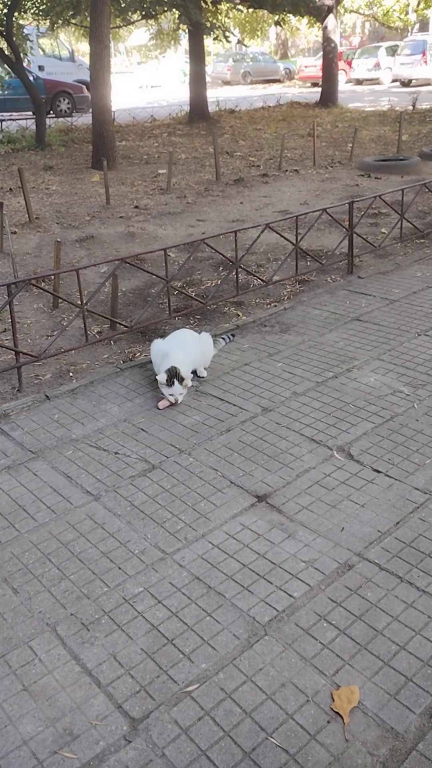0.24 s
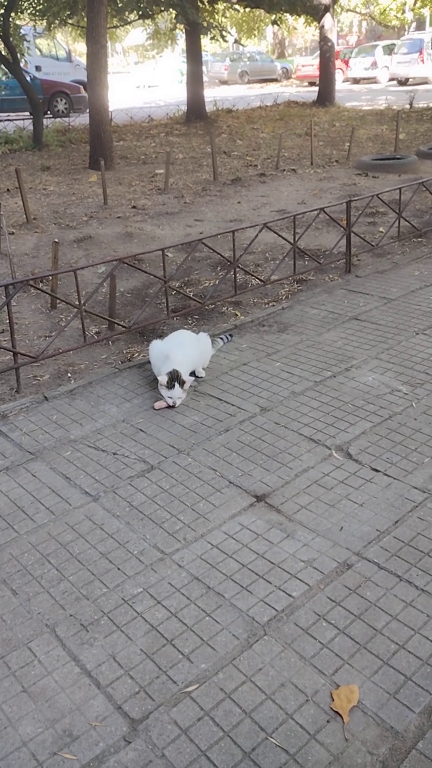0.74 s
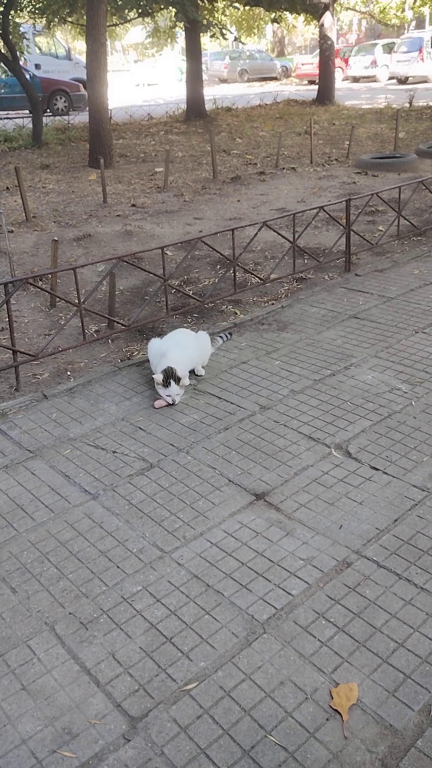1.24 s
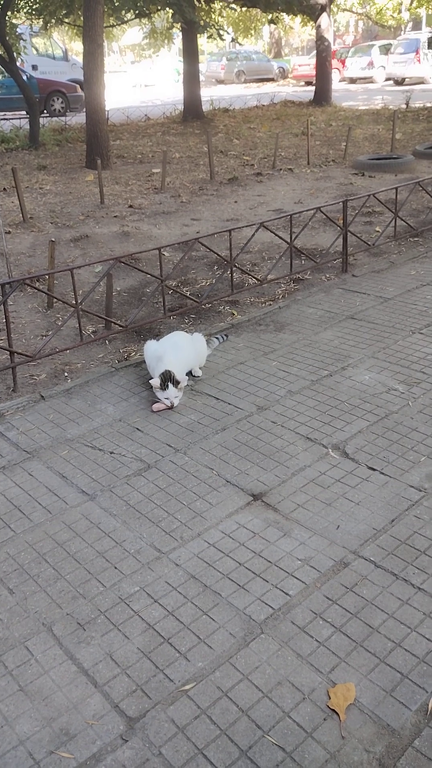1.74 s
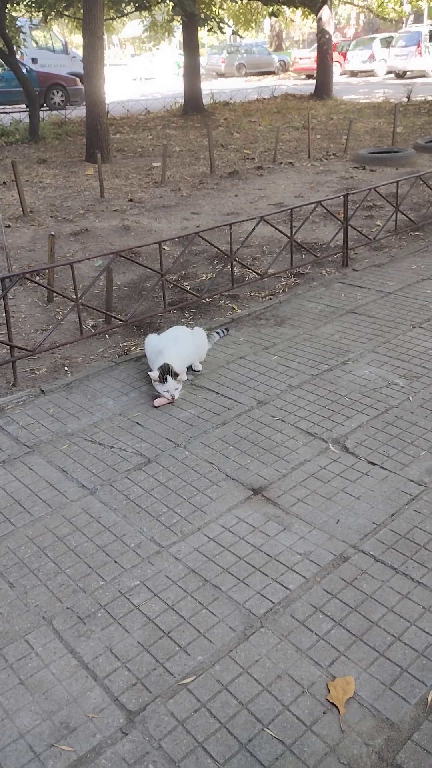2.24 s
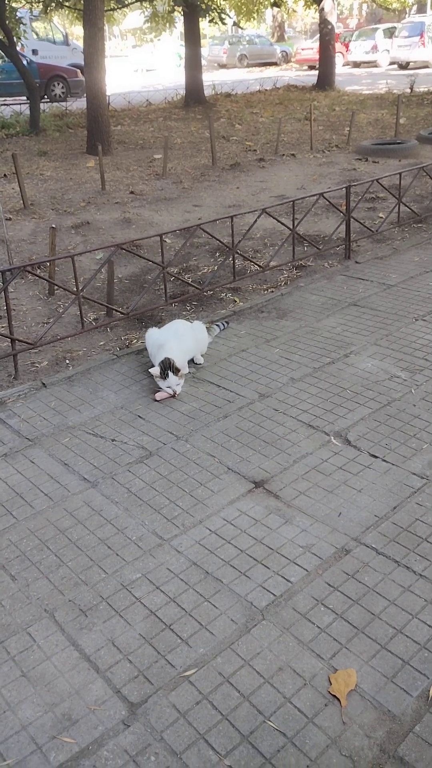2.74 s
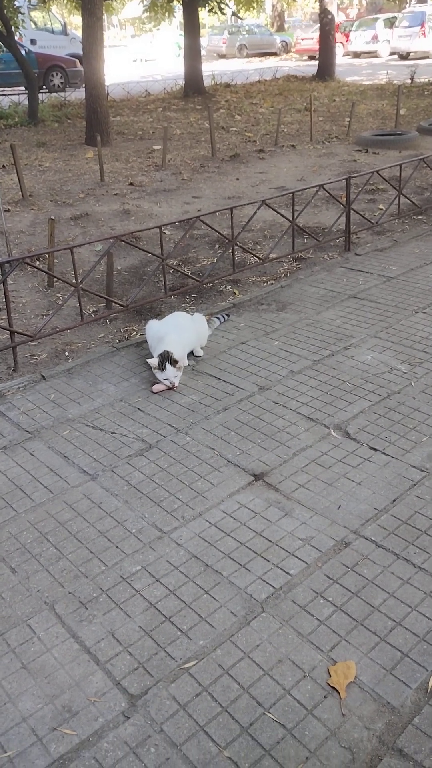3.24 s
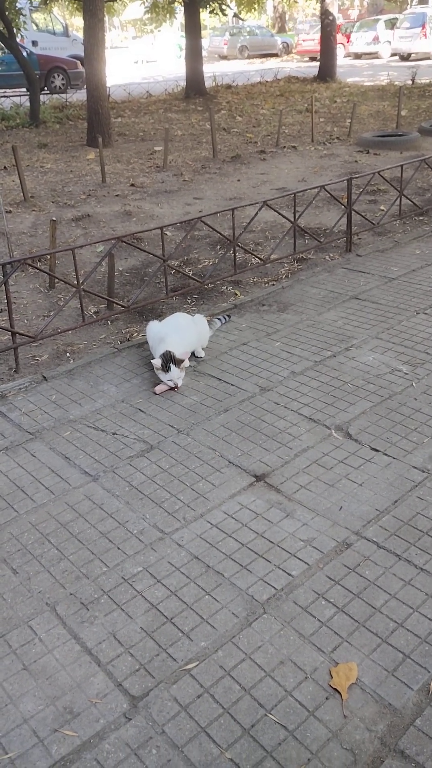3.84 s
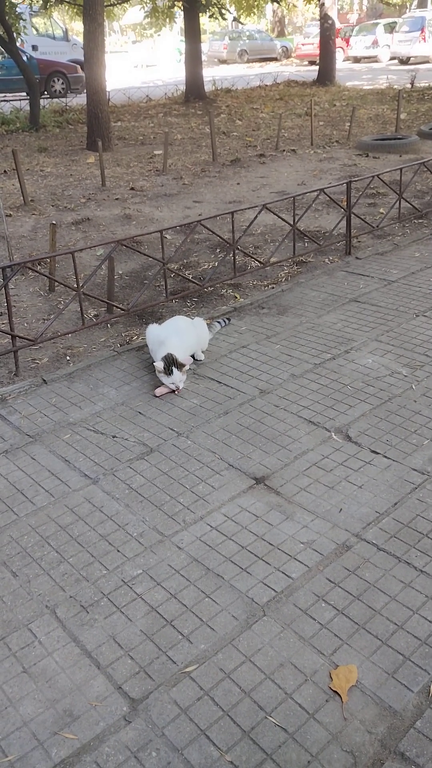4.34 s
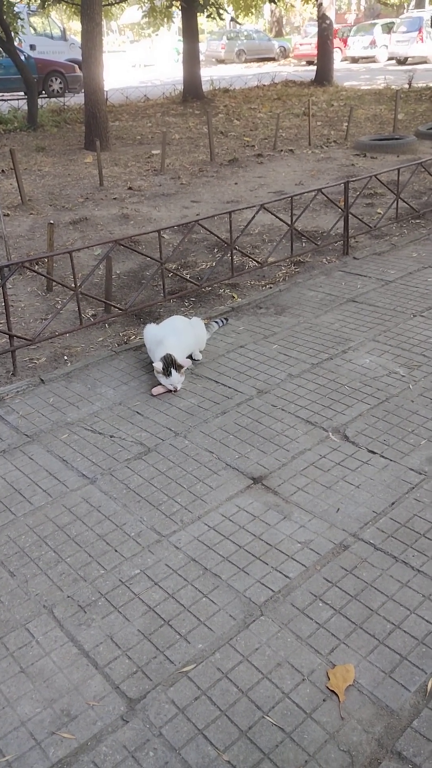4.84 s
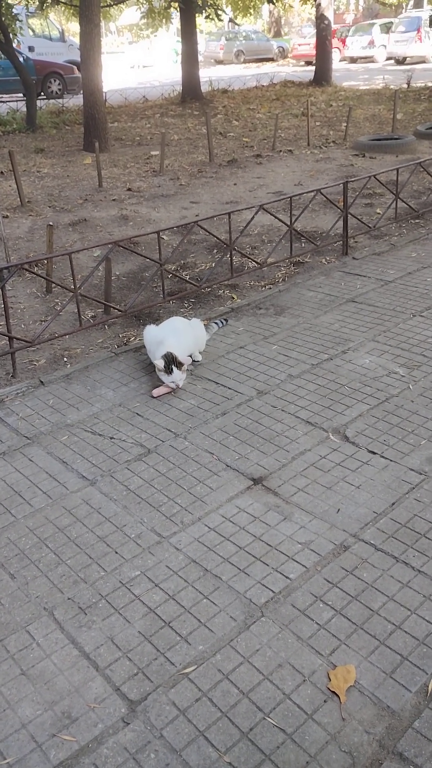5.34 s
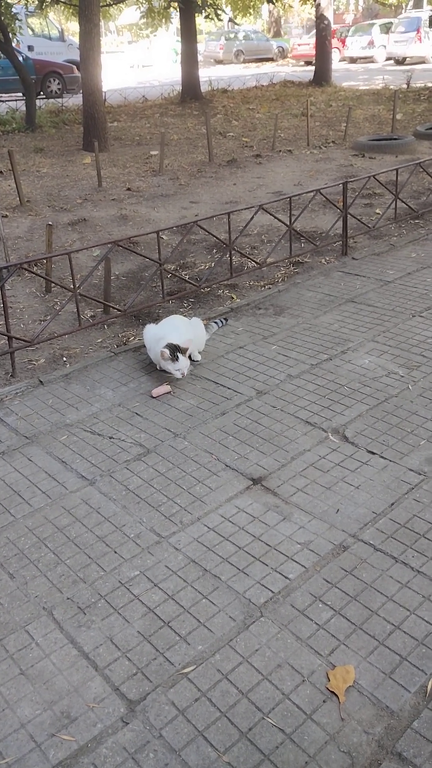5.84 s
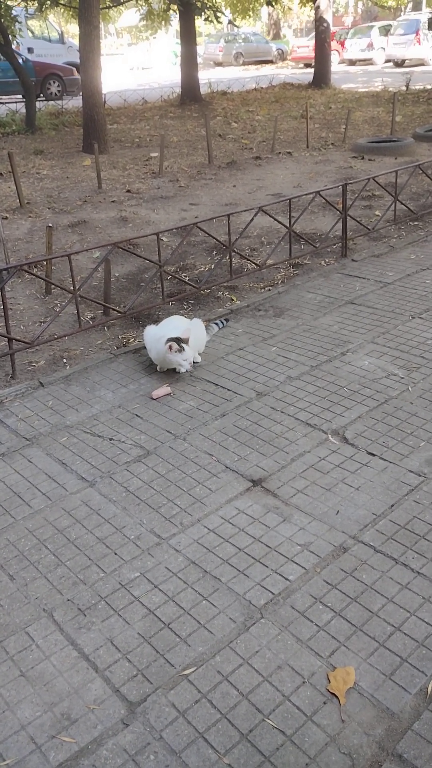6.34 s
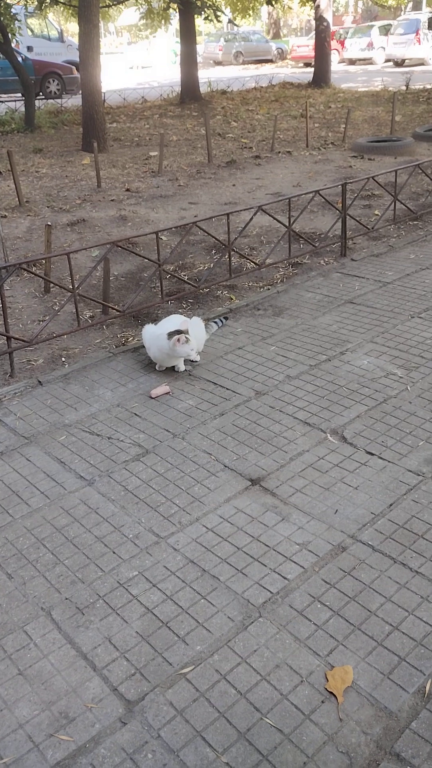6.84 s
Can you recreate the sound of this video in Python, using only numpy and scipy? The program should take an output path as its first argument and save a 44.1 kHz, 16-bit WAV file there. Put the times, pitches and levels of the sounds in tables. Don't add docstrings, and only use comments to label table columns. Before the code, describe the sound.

On a quiet pavement near a car park, distant traffic rumbles constantly. A heavy engine hunts at idle as a car drones away and a brake squeals faintly. After a tiny tick the heavy engine pulls away, deep and rising, with a thin bird squeak and light knock. Later a car cruises nearer, tyres hiss, a dull knock sounds and the car speeds up. Handheld phone, stereo.

```python
import sys
import numpy as np
from scipy import signal
from scipy.fft import rfft, irfft, next_fast_len
from scipy.io import wavfile
from scipy.ndimage import uniform_filter1d, map_coordinates

SR = 44100
rng = np.random.default_rng(int(sys.argv[2]) if len(sys.argv) > 2 else 0)


def master_out(mix):
    frames = np.transpose(np.atleast_2d(mix))
    ceiling = np.clip(frames, -1, 1)
    pcm = np.round(ceiling * 32767).astype(np.int16)
    wavfile.write(sys.argv[1], SR, pcm)


def magnitude_from_level(level_db):
    exponent = np.asarray(level_db, float) / 20
    return 10 ** exponent


N = 313110
T = np.arange(N) / SR
M = next_fast_len(N)
HZ = np.maximum(np.fft.rfftfreq(M, 1 / SR), 1)
FRAME = 1024


def columns(table, fade_s=0.08):
    s, *cols = np.transpose(table)
    opening = np.clip((T - s[0]) / fade_s + 1, 0, 1)
    closing = np.clip((s[-1] - T) / fade_s + 1, 0, 1)
    return [np.interp(T, s, c) for c in cols] + [opening * closing]


def at(table, hz):
    f, v = np.transpose(table)
    return np.interp(np.log(hz), np.log(np.maximum(f, 1)), v)


def unit(x):
    return x / np.sqrt(np.mean(x ** 2))


def smooth_twice(x, size, axes):
    for width, axis in zip(size, axes):
        x = uniform_filter1d(x, size=width, axis=axis)
    return x


def walk(rate_hz):
    hold = int(SR / rate_hz)
    steps = np.repeat(rng.standard_normal(N // hold + 1), hold)
    return unit(smooth_twice(steps, (hold, hold), (0, 0))[:N])


def wave(spectrum):
    return irfft(spectrum, M)[..., :N]


def strokes(rows, rise_s, fall_db_s):
    power = 0
    for s, db, hold_s in rows:
        lost_db = fall_db_s * np.maximum(T - s - abs(hold_s), 0)
        rise = np.clip((T - s) / rise_s + 1, 0, 1)
        power = power + (magnitude_from_level(db - lost_db) * rise) ** 2
    return np.sqrt(power)


def faded(table):
    db, gate = columns(table, fade_s=0.53)
    return gate * magnitude_from_level(db)


def bumps(rows, spread_s):
    return sum(db * np.exp(-0.5 * ((T - s) / spread_s) ** 2) for s, db in rows)


# (frequency [Hz], level [dB])
LEFT_DB = [(60, -2.5), (110, -1.5), (200, -0.5), (370, -1.5), (670, -2.5), (1230, -3.5), (2240, -3.0),
           (4100, -1.0), (7490, 1.5), (13700, 0.5)]
# (frequency [Hz], lead [rad])
LEFT_LEAD_RAD = [(60, 0.56), (150, 0.25), (300, 0.14), (1000, 0.17), (2000, 0.92)]


def ports(left, right):
    lean = magnitude_from_level(at(LEFT_DB, HZ) / 2) * np.exp(0.5j * at(LEFT_LEAD_RAD, HZ))
    return np.array([left * lean, right / lean])


def at_ports(mono):
    spectrum = rfft(mono, M)
    return wave(ports(spectrum, spectrum))


# (frequency [Hz], likeness [0-1])
LIKENESS = [(60, .95), (130, .96), (280, .985), (610, .6), (1340, .22), (2900, .02), (13700, 0)]


def noise_pair():
    like = np.clip(at(LIKENESS, HZ), 0, 1)
    real, imag = rng.standard_normal((2, 2, len(HZ)))
    mid, side = (real + 1j * imag) * np.sqrt([1 + like, 1 - like])
    return ports(mid + side, mid - side)


def ringing(modes):
    power = sum(magnitude_from_level(2 * db) / (1 + (2 * (HZ - hz) / width) ** 4) / width for hz, width, db in modes)
    return unit(wave(noise_pair() * np.sqrt(power)))


def rolling(envelope, colour):
    return envelope * magnitude_from_level(5 + 0.82 * walk(9)) * ringing(colour)


def engine(hz, orders, levels_db, gate, wobble_rad, flutter_db):
    phase = 2 * np.pi * np.cumsum(hz) / SR
    tones = 0
    for order, db in zip(orders, levels_db):
        level = np.sqrt(2) * magnitude_from_level(db + flutter_db * walk(21.933))
        tones = tones + level * np.sin(order * phase + wobble_rad * walk(14))
    return gate * tones


# (frequency [Hz], level [dB])
WHINE = [
    (12048, -103),
    (13399, -100),
]


def electronics():
    return sum(np.sqrt(2) * magnitude_from_level(db) * np.sin(2 * np.pi * hz * T + 0.9 * walk(30)) for hz, db in WHINE)


# (frequency [Hz], level [dB per Hz])
TOWN = [(25, -38), (40, -12.5), (75, -3.5), (140, -3.5), (280, -13.5), (440, -16.5), (600, -21.5),
        (950, -18), (1600, -19.5), (2600, -29), (3800, -42.5), (5300, -47), (7800, -55.5), (14200, -62.5)]
# (time [s], load of heavy vehicles [0-1], flow of cars [0-1])
TRAFFIC = [(0.0, 0.56, 0.6), (.45, 0.16, 0.5), (1.0, 0.24, 0.23), (1.4, 0.98, 0.17), (1.9, 1, 0.2),
           (2.5, 0.99, 0.15), (3.25, 1, 0.2), (3.6, .45, .65), (4.1, 0.5, 0.71), (4.5, 0.44, .8),
           (4.8, 0.3, .75), (5.3, .01, 0.8), (5.65, 0, 0.4), (5.95, 0.06, 0.23), (6.4, 0.33, 0.36),
           (6.75, 0.3, 0.67), (7.1, 0.15, 0.44)]
# (level [dB] each) at rest, added by full load, by full flow
REST_DB = [-5.5, -2, -2.5, -0.83]
LOAD_DB = [14, 4.5, -2, 0.2]
FLOW_DB = [.1, 2.7, 8.6, .1]


def traffic():
    roar = magnitude_from_level(-34.5) * unit(wave(noise_pair() * magnitude_from_level(at(TOWN, HZ))))
    hz, s, cells = signal.stft(roar, SR, nperseg=4 * FRAME, noverlap=3 * FRAME)

    times, load, flow = np.transpose(TRAFFIC)
    load_db = np.outer(np.interp(s, times, load), LOAD_DB)
    flow_db = np.outer(np.interp(s, times, flow), FLOW_DB)
    changes_db = (REST_DB + load_db + flow_db).T
    changes_db[-1] += 3 * np.exp(-s / 1.6)
    below = 1 / (1 + (hz[:, None] / np.array([55, 330, 590])) ** 6)
    shares = np.diff(below, prepend=0, append=1, axis=1)

    chance = uniform_filter1d(rng.standard_normal((22, len(s))), size=5, axis=1)
    half_octave = 2 * np.log2(np.maximum(hz, 16) / 16)
    place = np.meshgrid(half_octave, np.arange(len(s)), indexing="ij")
    flicker_db = 0.89 * map_coordinates(chance, place, order=1, mode="nearest")
    cells = cells * magnitude_from_level(shares @ changes_db + flicker_db)
    return signal.istft(cells, SR, nperseg=4 * FRAME, noverlap=3 * FRAME)[1][:, :N]


# (time [s], level [dB], hold [s], rise [s], fall [dB/s])
SQUEAK = [
    (2.248, -72.5, .15, .04, 92),
    (2.394, -77.5, .12, .12, 61.5),
]
# (frequency [Hz], width [Hz], level [dB])
SQUEAK_NOTES = [
    [(7743, 110, 1), (7950, 110, -2)],
    [(7230, 140, 1), (7500, 120, -3)],
]


def squeak():
    notes = 0
    for (s, db, hold_s, rise_s, fall_db_s), bands in zip(SQUEAK, SQUEAK_NOTES):
        notes = notes + magnitude_from_level(5) * strokes([(s, db, hold_s)], rise_s, fall_db_s) * ringing(bands)
    return notes


# (frequency [Hz], width [Hz], level [dB])
TICK_COLOUR = [(12100, 1800, 0), (13900, 800, -4)]


def tick():
    time_s, level_db, spread_s, left_minus_right_db = 0.988, -66, 0.011, 5
    pan_db = np.array([[left_minus_right_db], [-left_minus_right_db]]) / 2
    return magnitude_from_level(level_db + pan_db) * np.exp(-np.abs(T - time_s) / spread_s) * ringing(TICK_COLOUR)


# (time [s], level [dB], hold [s])
BRAKE = [(.07, -63.5, .075), (.222, -61.5, 0.057), (.31, -66, .04), (.378, -59.5, .055), (.47, -67.5, .06)]
# (time [s], level [dB], hold [s])
BRAKE_RING = [(.5, -67.5, .03)]
# (frequency [Hz], width [Hz], level [dB])
DISC = [(4460, 110, -8.5), (5050, 420, -3.5), (5650, 300, -7.5), (6620, 590, -1), (6770, 78, -4.5),
        (6950, 440, -2.5), (8160, 900, -14), (10700, 900, -18), (13070, 600, -22.5)]


def brake():
    slips = strokes(BRAKE, rise_s=0.035, fall_db_s=150)
    ring = strokes(BRAKE_RING, rise_s=0.035, fall_db_s=25)
    return np.hypot(slips, ring) * magnitude_from_level(4.5 + 0.8 * walk(30)) * ringing(DISC)


# (time [s], level [dB], hold [s], sign ignored)
LEAVING = [(.07, -42, -0.73), (.28, -42.5, -1.06), (.5, -45.5, -0.05), (.7, -45, 1.1), (1.0, -52, 0.5)]
# (frequency [Hz], width [Hz], level [dB])
LEAVING_DRONE = [(245.8, 16, 4), (306.5, 10, -5), (216, 18, -0.5)]


def leaving_car():
    return magnitude_from_level(-6) * rolling(strokes(LEAVING, rise_s=0.1, fall_db_s=114), LEAVING_DRONE)


# (time [s], level [dB])
FIRST = [(3.3, -68.5), (4.05, -68), (4.3, -65), (5.37, -57.5), (5.57, -63), (5.9, -68)]
SECOND = [(5.6, -68.5), (5.82, -62), (6.45, -61.5), (6.49, -56.5), (6.6, -58), (7.04, -55), (7.1, -52.5)]
# (frequency [Hz], width [Hz], level [dB])
FIRST_TYRES = [(3100, 2800, 6.5), (3870, 370, -5), (4560, 380, -3.5), (5800, 1100, -4.5), (6500, 1100, -6),
               (7640, 830, -10), (8430, 500, -10.5), (9700, 1000, -12), (12500, 3000, -18)]
SECOND_TYRES = [(2840, 1900, 8), (3720, 350, -0.5), (4230, 560, -2), (5100, 700, -7), (5920, 860, -1.5),
                (6750, 680, -11.5), (8200, 1200, -14), (9400, 1100, -17), (12500, 3000, -19.5)]


def tyres():
    return rolling(faded(FIRST), FIRST_TYRES) + rolling(faded(SECOND), SECOND_TYRES)


# (time [s], level [dB], hold [s], sign ignored)
GEARS = [(4.55, -60.5, 0.5), (5.03, -63, 3), (5.39, -63, .01), (5.6, -76, 3), (5.92, -63, -2),
         (6.48, -59, -0.5), (6.6, -70, 0.5), (6.95, -57, .2)]
# (frequency [Hz], width [Hz], level [dB])
GEAR_NOTE = [(3070, 100, 0)]


def gears():
    return magnitude_from_level(-5) * rolling(strokes(GEARS, rise_s=0.14, fall_db_s=113), GEAR_NOTE)


# (time [s], frequency [Hz], level [dB])
CLIMB = [(5.3, 3420, -80), (5.6, 3500, -73), (6.0, 3720, -72), (6.4, 3770, -75), (6.75, 3820, -71),
         (7.1, 3800, -72)]


def transmission():
    hz, db, gate = columns(CLIMB)
    unsteady_hz = hz * (1 + 0.006 * walk(60))
    return at_ports(engine(unsteady_hz, [1], [db], gate, wobble_rad=0.8, flutter_db=4))


# (time [s], peak level [dB], frequency [Hz], t60 [s])
KNOCKS = [
    (2.605, -38, 615, .11),
    (6.485, -25.5, 335, .075),
]


def knocks():
    low = 0
    for s, db, hz, t60_s in KNOCKS:
        t = np.maximum(T - s, 0)
        ring = 1.5 * (1 - np.exp(-t / (0.15 * t60_s))) * np.exp(-np.log(1000) * t / t60_s)
        low = low + 2 * magnitude_from_level(db) * ring * np.sin(2 * np.pi * hz * t)
    return at_ports(low)


# (time [s], exhaust note [Hz], level [dB], throttle [0-1])
CAR = [(3.4, 144.2, -43, .1), (4.0, 141.8, -40, 0.1), (4.6, 140, -41.5, .2), (5.2, 140.1, -53, 0.2),
       (5.8, 138, -55, 0.42), (6.3, 139.8, -47.5, 0.74), (6.6, 145.3, -44.5, 0.98),
       (6.8, 144.7, -44.5, 0.46), (7.1, 151.1, -44.5, 1.1)]
# (time [s], gain [dB])
GAPS = [(4.22, 5.9), (4.48, 2.9), (4.7, 5.8), (5.0, 6), (5.27, 4.6), (5.74, 15), (6.0, 13), (6.27, 9.6),
        (6.47, 13), (6.66, 7.4), (6.85, 8), (7.06, 7)]


def cruising_car():
    hz, db, throttle, gate = columns(CAR)
    db = db + bumps(GAPS, spread_s=0.058)
    octave_db = db - 19.5 + 15 * throttle
    return at_ports(engine(hz, [1, 2], [db, octave_db], gate, wobble_rad=0.4, flutter_db=1.5))


# (time [s], firing rate [Hz], level [dB])
IDLE = [(0.0, 62.3, -37.5), (0.074, 63.8, -35), (0.336, 63.6, -42), (0.426, 66.3, -65),
        (0.512, 70.5, -33.5), (0.6, 73.1, -54), (0.8, 72.5, -45), (0.922, 59.2, -33.5), (1.0, 59.9, -54.5)]


def idle():
    hz, db, gate = columns(IDLE)
    return at_ports(engine(hz, [1], [db], gate, wobble_rad=0.49, flutter_db=-1.0))


# (time [s], firing rate [Hz], nearness [dB])
TRUCK = [(1.05, 61.2, -25), (1.12, 62.3, -10), (1.55, 66.15, -2), (1.85, 68.74, -0.5), (2.15, 72.64, -1),
         (2.5, 75.87, -1), (2.65, 77.7, -0.5), (3.0, 81.02, -1.5), (3.4, 86.06, -2), (3.6, 87.4, -0.5),
         (3.9, 90.86, 0), (4.25, 93.4, -1.5), (4.65, 96.04, -3.5), (4.9, 98.75, -6.5), (5.6, 102, -21.5)]
TRUCK_ORDERS = [1, 2, 3, 4, 5, 3.5]
TRUCK_ORDERS_DB = [-0.6, -0.54, -8, -13, -23.5, -17]
# (frequency [Hz], width [Hz], level [dB])
RESONANCES = [(67.5, 9.1, -30), (73.2, 2.5, -25.5), (76.2, 3.5, -23), (81.54, 4.3, -23), (85.1, 1, -24.5),
              (87.4, 1.5, -27.5), (92.8, 7, -33.5), (125.2, 10, -24), (138, 11.8, -27.5), (164.4, 5.1, -31),
              (175.53, 4.5, -21), (182.8, 6.1, -24), (190.4, 4.9, -23.5), (199.3, 9, -25.5),
              (99.5, 4.4, -29.5), (201.1, 4.3, -25.5), (207.9, 6.1, -24), (221.6, 5.6, -31.5), (238, 16, -34.5),
          (252.2, 12, -34), (272.6, 4.1, -38), (303.4, 9.6, -34.5), (339, 8, -34), (389.4, 19, -31.5),
          (474, 8, -26)]
# (time [s], loss [dB])
SHADOWS = [(1.36, 2.4), (1.62, 1.8), (1.8, 4), (2.03, 2.5), (2.38, 4), (2.82, 5), (3.2, 4.1), (3.36, 3),
           (3.47, 2.5), (3.68, 4.8), (3.81, 5), (4.21, 4), (4.45, 4.5), (4.8, 6), (5.06, 8.6), (5.31, 7.2)]


def truck():
    hz, near_db, gate = columns(TRUCK)
    near_db = near_db - bumps(SHADOWS, spread_s=0.035)
    scale_hz = np.arange(40.0, 600, 0.1)
    power = magnitude_from_level(2 * -45.5)
    for f, width, top_db in RESONANCES:
        power = power + magnitude_from_level(2 * top_db) / (1 + (2 * (scale_hz - f) / width) ** 4)
    response_db = 10 * np.log10(power)
    levels_db = []
    for order, db in zip(TRUCK_ORDERS, TRUCK_ORDERS_DB):
        levels_db.append(db + near_db + np.interp(order * hz, scale_hz, response_db))
    return at_ports(engine(hz, TRUCK_ORDERS, levels_db, gate, wobble_rad=0.3, flutter_db=1.16))


def scene():
    background = electronics() + traffic()
    small = squeak() + tick() + brake() + knocks()
    cars = leaving_car() + tyres() + gears() + transmission() + cruising_car()
    return background + small + cars + idle() + truck()


def thin_treble(x, from_hz, under_db, scatter_db):
    hz, _, cells = signal.stft(x, SR, nperseg=FRAME)
    power = np.mean(np.abs(cells) ** 2, axis=0)
    patch = smooth_twice(power, (3, 3), (0, 1))
    around = smooth_twice(power, (15, 5), (0, 1))
    chance = smooth_twice(rng.standard_normal(power.shape), (4, 6), (0, 1))
    bar = around * magnitude_from_level(2 * (under_db + scatter_db * unit(chance)))
    keep = 1 / (1 + (bar / (patch + 1e-20)) ** 6)
    keep[hz < from_hz] = 1
    return signal.istft(cells * keep, SR, nperseg=FRAME)[1][:, :N]


def top_cut(x):
    return signal.sosfilt(signal.butter(12, 14290, fs=SR, output="sos"), x)


def record(dry):
    mix = thin_treble(dry, from_hz=4000, under_db=-3.3, scatter_db=3.2)
    return top_cut(mix)


dry = scene()
out = record(dry)
master_out(out)
```